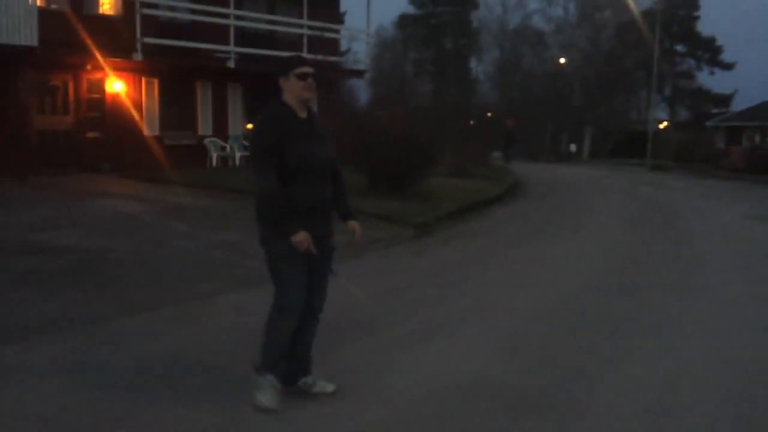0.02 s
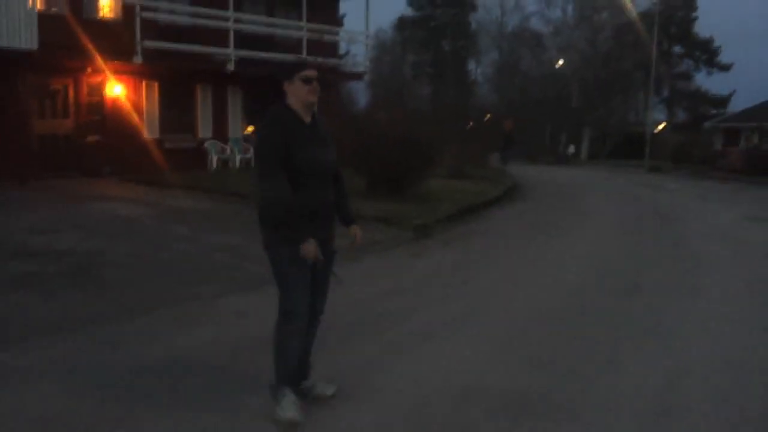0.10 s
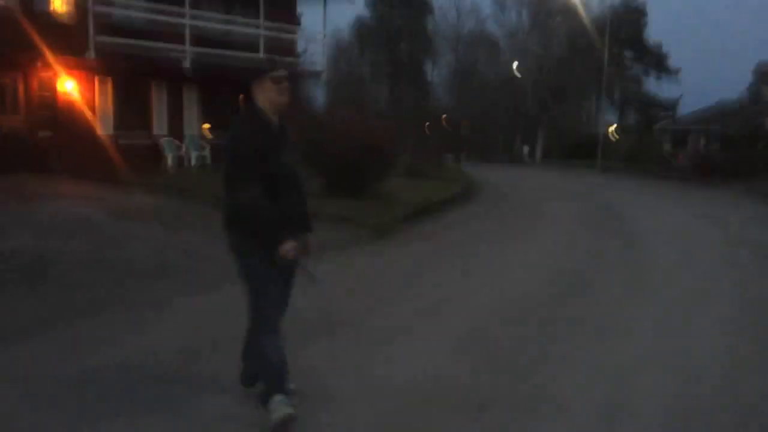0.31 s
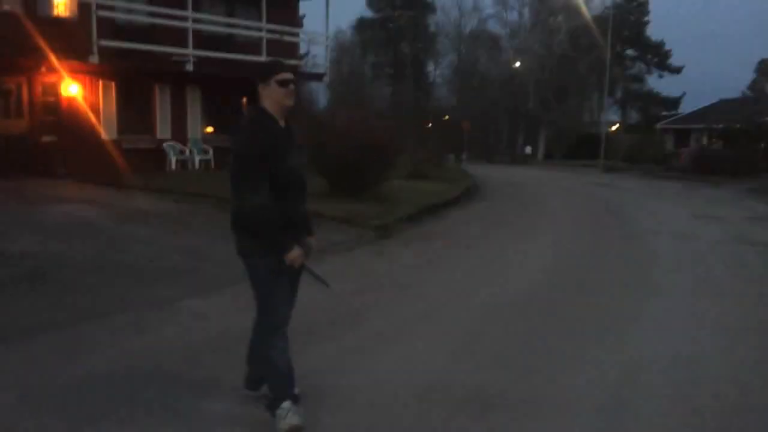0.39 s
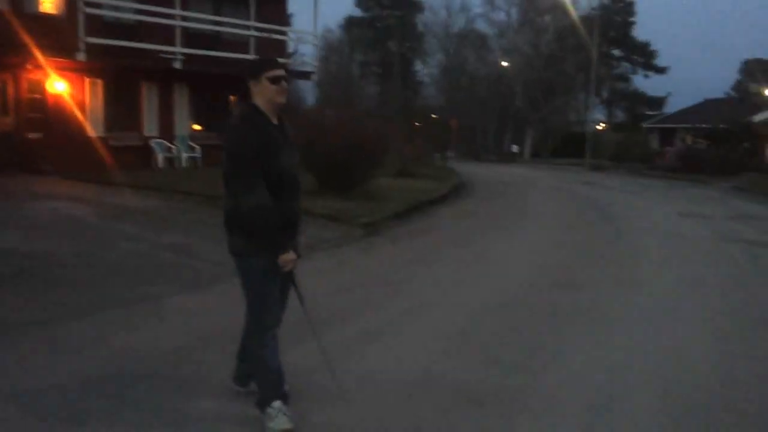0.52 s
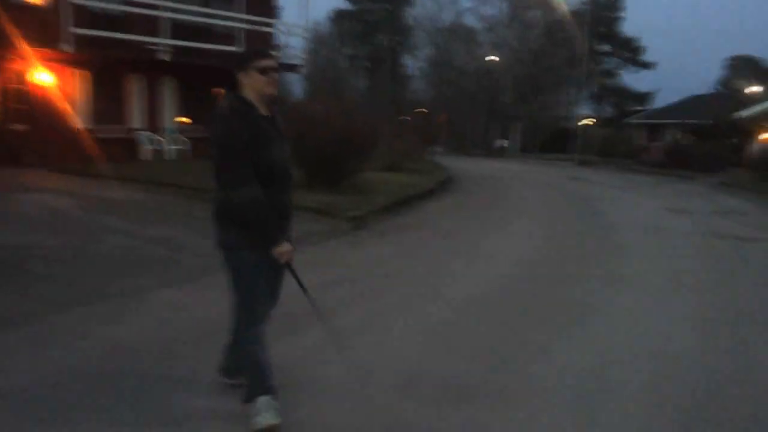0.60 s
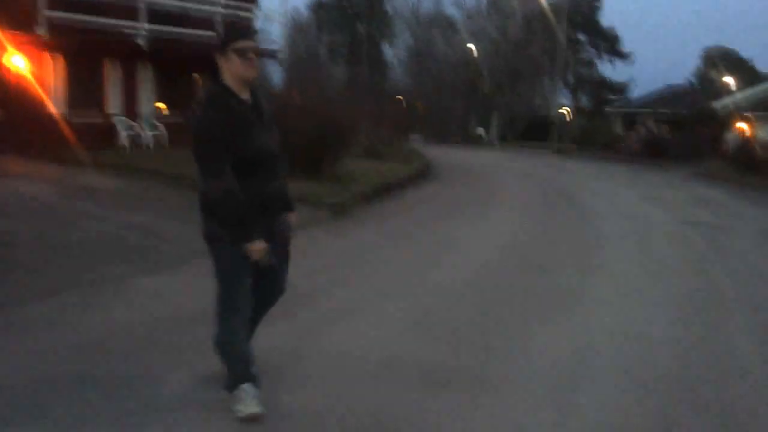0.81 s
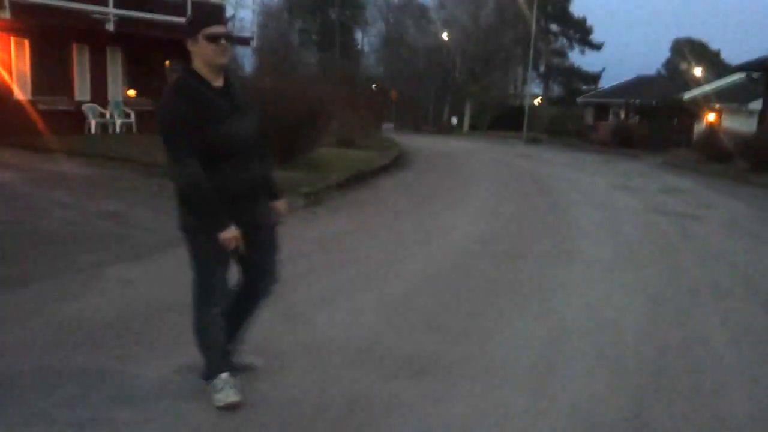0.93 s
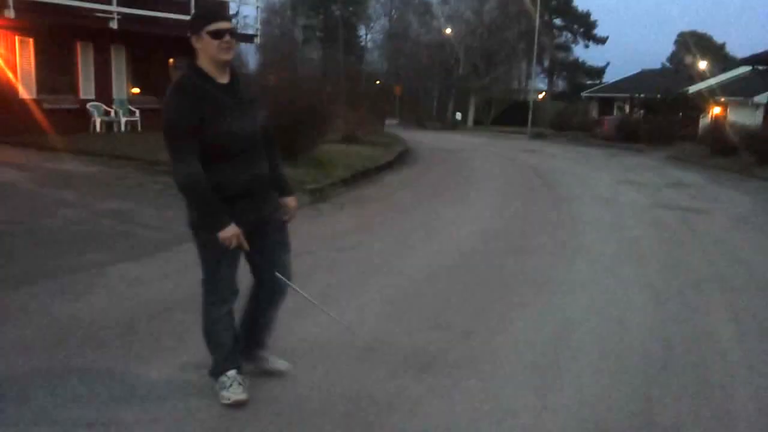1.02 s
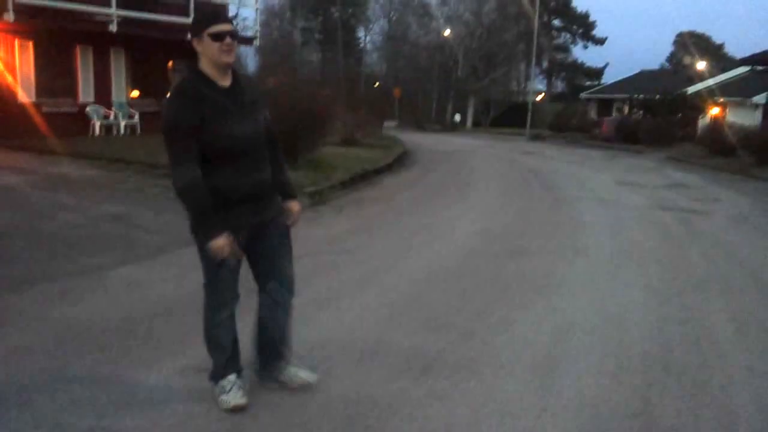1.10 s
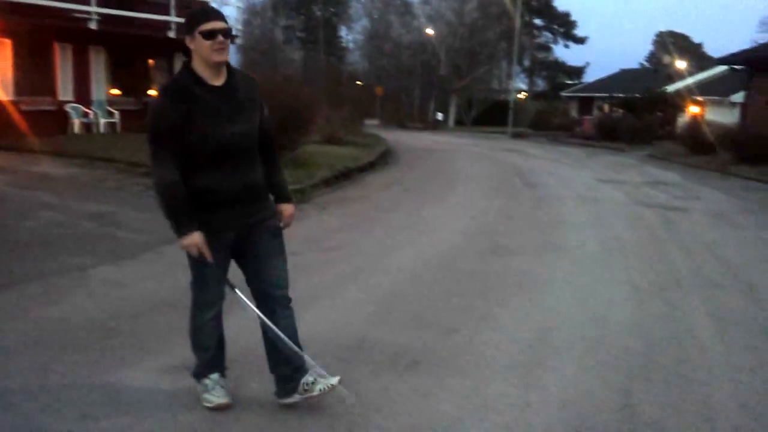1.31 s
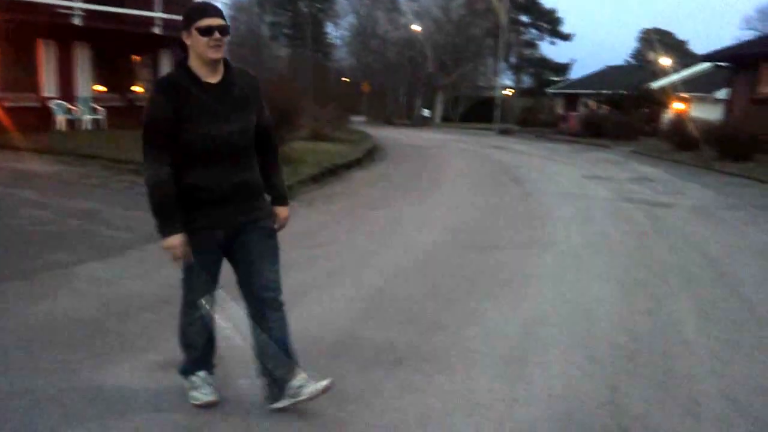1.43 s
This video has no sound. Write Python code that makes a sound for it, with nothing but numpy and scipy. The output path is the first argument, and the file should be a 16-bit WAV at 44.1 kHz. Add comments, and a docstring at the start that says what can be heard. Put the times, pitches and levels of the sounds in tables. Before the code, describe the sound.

A thin stick taps on asphalt four times at an even walking pace, at about 0.2, 0.6, 0.9 and 1.2 seconds. Each tap is a close, sharp, slightly crunchy click with a very short ring and a faint outdoor echo. Loose grit scuffs softly between them, with small stone ticks around the last two taps. A quiet, steady street hiss lies underneath throughout.

```python
"""A thin stick taps four times on asphalt, at walking pace, on a quiet street.
At each tap the tip chatters over the stones for a few milliseconds and excites the shaft's modes;
loose grit ticks and scuffs around the taps. Houses and trees reflect the sound faintly over a soft
outdoor hiss, and the loudest clicks overload the microphone."""
import sys
import numpy as np
from scipy import signal
from scipy.fft import rfft, irfft, next_fast_len
from scipy.io import wavfile
from scipy.ndimage import map_coordinates

SR = 44100
rng = np.random.default_rng(int(sys.argv[2]) if len(sys.argv) > 2 else 0)


def transcribe(signal):
    """Save signal, clipped to [-1, 1], as a 16-bit WAV file at the path in sys.argv[1]."""
    frames = np.atleast_2d(signal).T
    limited = np.clip(frames, -1, 1)
    pcm = np.round(limited * 32767).astype(np.int16)
    wavfile.write(sys.argv[1], SR, pcm)


N = 66150
T = np.arange(N) / SR
PAD = next_fast_len(N + 4096, real=True)
HZ = np.fft.rfftfreq(PAD, 1 / SR)
ATTACK_S, BASS_HZ, TREBLE_HZ = 0.00034, 1200, 7500

# Taps: t/s, gain/dB, resonance f/Hz, its lift/dB, its width/octaves, bass/dB, treble/dB,
# ring gain/dB, ring tilt/(dB per octave), echo gain/dB
TAPS = [(0.2346, -6.5, 4080, 10, 0.3, -1.5, -1, -1, 4, -25),
        (.5600, -5.5, 4310, 9.5, 0.27, -0.5, -7.5, -7, 0.5, -22),
        (0.8846, -11.5, 5550, 5, 0.256, 2.5, -1, -1.5, -0.5, -18),
        (1.209, -7.5, 2650, 4.5, 0.54, 2.5, 0, 5, -1.5, -17.5)]


def amp(db):
    """Amplitude ratio of a level in decibels."""
    return 10 ** (np.asarray(db) / 20)


def unit(x):
    """Normalisation to rms 1."""
    return x / np.sqrt(np.mean(x ** 2) + 1e-20)


def along(points, hz):
    """Interpolation of (f/Hz, value) points on a logarithmic frequency axis."""
    f, v = np.transpose(points)
    return np.interp(np.log(hz + 1), np.log(f + 1), v)


def filtered(x, response):
    """Linear filtering: the spectrum times a frequency response."""
    return irfft(rfft(x, PAD) * response, PAD)[:N]


def causal(gain):
    """Minimum-phase response with this gain: nothing sounds before its cause."""
    cepstrum = irfft(np.log(np.maximum(gain, 1e-6)), PAD)
    cepstrum[1:PAD // 2] *= 2
    cepstrum[PAD // 2 + 1:] = 0
    return np.exp(rfft(cepstrum))


def hump(hz, octaves):
    """Resonance curve with a peak of 1."""
    return 1 / (1 + (np.log2((HZ + 1) / hz) / octaves) ** 2)


def noise(gain):
    """Spectrally shaped Gaussian noise of rms 1."""
    return unit(filtered(rng.standard_normal(N), gain))


def burst(start, t60):
    """Impact envelope: a fast attack, then exponential decay by 60 dB in t60 seconds."""
    out = np.zeros(N)
    live = slice(round(start * SR), round((start + 2 * t60) * SR))
    age = np.maximum(T[live] - start, 0)
    out[live] = (1 - np.exp(-age / ATTACK_S)) * np.exp(-np.log(1000) * age / t60)
    return out


def air():
    """Ambient noise of the open street: broadband rumble and hiss, wavering slightly in level."""
    # Noise spectrum: f/Hz, relative density level/dB
    spectrum = [(25, -4), (50, 0), (100, -1), (170, -3.5), (280, -0.5), (420, -8), (520, -5), (700, -7.5),
                (1000, -11), (1600, -13), (3000, -13.5), (5500, -12.5), (7000, -13.5), (11500, -24.5),
                (15000, -39)]
    waver_db = 0.24 * map_coordinates(rng.standard_normal(32), [T * 10])
    return amp(-50.5 - waver_db) * noise(amp(along(spectrum, HZ)))


def grit():
    """Impact and friction noise: single stones tick, and fine grains scuff in swells."""
    # Stone impacts: t/s, level before filtering/dB, f/Hz, t60/s
    ticks = [(0.8522, -28, 6530, 0.0044), (0.8621, -30.5, 6000, 0.0091), (0.8713, -32, 6040, 0.0046),
             (.9190, -10.5, 6100, 0.0059), (0.9296, -15, 5900, 0.0061), (0.956, -28, 5500, .005),
             (1.2464, -14.5, 6000, 0.0085), (1.2822, -26.5, 5170, 0.0065), (1.2890, -21.5, 4560, .013)]
    # Scuffs: peak t/s, level before filtering/dB, rise/s, t60/s, f/Hz, width/octaves
    scuffs = [(0.053, -46, 0.079, 0.138, 4980, 0.49), (.13, -52, 0.0227, 0.157, 5450, 0.42),
              (.265, -34, 0.0122, 0.093, 7500, .5), (.308, -35.5, .025, 0.261, 7600, 0.87),
              (.403, -42.5, .012, 0.072, 5700, .6), (0.59, -36.5, .012, 0.24, 7000, 0.25),
              (.658, -47.5, 0.0062, 0.074, 2800, .11), (0.914, -31, 0.019, 0.087, 6060, 0.46),
              (.975, -40, 0.054, 0.67, 4590, 0.44), (1.253, -35.5, .02, .2, 5340, 0.3),
              (1.305, -40.5, 0.028, 0.25, 3900, 0.59), (1.38, -46.5, 0.021, .2, 4600, 0.36),
              (1.449, -44, .025, 0.136, 4545, 0.36)]
    grain_db, grains_per_s = 3.5, 550
    out = sum(amp(db) * burst(at, t60) * noise(hump(hz, octaves=0.35)) for at, db, hz, t60 in ticks)
    bass_cut = 1 / (1 + (BASS_HZ / (HZ + 1)) ** 2)
    for at, db, rise, t60, hz, octaves in scuffs:
        swell = np.exp(np.minimum((T - at) / rise, np.log(1000) * (at - T) / t60))
        roughness = map_coordinates(rng.standard_normal(N // 8), [T * grains_per_s], order=1)
        grains = unit(amp(grain_db * roughness))
        out += amp(db) * swell * grains * noise(hump(hz, octaves) * bass_cut)
    hollow_undertone = amp(7.5 * hump(hz=2800, octaves=0.16))
    treble_cut = 1 / np.hypot(1, (HZ / 10000) ** 2)
    return filtered(out, hollow_undertone * treble_cut)


def stick():
    """Impact excitation: a tap is a few quick contacts; the spot struck colours crunch and ring."""
    # Contacts of tip and stone: t/s, relative level/dB, crunch t60/s
    contacts = [(0.2341, -1.5, 0.014), (0.2356, 4, 0.0085), (0.2381, -2, 0.0152), (.2395, -5, 0.0069),
                (.2410, -6, 0.013), (0.2466, -1.5, 0.0092), (.5600, 5.5, 0.0062), (0.5619, -5, 0.019),
                (0.5655, -3, 0.013), (.8843, -1.5, 0.025), (0.8862, 4, 0.02), (0.8893, 1.5, 0.024),
                (0.892, -6, 0.025), (0.8966, 2, 0.01), (1.211, -1, 0.0082), (1.2123, 0, 0.0089),
                (1.213, -3.5, 0.01134)]
    # Contact noise: f/Hz, relative density level/dB
    crunch_spectrum = [(120, -38), (320, -9), (480, -20), (740, -6), (1080, -11), (1750, -6), (2800, -2.5),
                       (4500, 0), (7000, -1.5), (8500, -5.5), (10000, -7), (11500, -12.5), (15000, -13.5)]
    out = np.zeros(N)
    starts = np.array([row[0] for row in TAPS])
    bass_shelf = 1 / (1 + (HZ / BASS_HZ) ** 2)
    treble_shelf = (1 + np.tanh(2 * np.log2((HZ + 1) / TREBLE_HZ))) / 2
    for i, tap in enumerate(TAPS):
        _, db, hz, lift_db, octaves, bass_db, treble_db, ring_db, tilt_db, echo_db = tap
        touches = [row for row in contacts if np.argmin(abs(starts - row[0])) == i]
        force = np.sqrt(sum((amp(level) * burst(at, t60)) ** 2 for at, level, t60 in touches))
        ring = amp(ring_db - 15.5) * shaft(touches, tilt_db)
        crunch = force * noise(amp(along(crunch_spectrum, HZ)))
        echo = amp(echo_db) * street(crunch + amp(-8) * ring)  # more crunch than ring returns
        colour_db = lift_db * hump(hz, octaves) + bass_db * bass_shelf + treble_db * treble_shelf
        out += filtered(crunch + ring + echo, causal(amp(db + colour_db)))
    return out


def shaft(touches, tilt_db):
    """Damped modal vibration: every contact adds energy to all the modes of the shaft."""
    # Shaft modes: f/Hz, relative level/dB, t60/s
    modes = [(349, -25.5, 0.044), (923.8, -15, 0.0353), (1357, -8, 0.04), (2000, -2.5, 0.0265),
             (2265, -8, 0.0213), (2952, -6.5, 0.028), (3169, -3, 0.02), (3533, -1, 0.019),
             (3714, -2.5, 0.0167), (4078, -5, 0.016), (4540, 3, 0.022), (5016, -2, 0.014),
             (5705, -5.5, 0.03), (6724, 1.5, 0.015)]
    pivot_hz, scatter_db = 3700, 2.76
    hz, db, t60 = np.transpose(modes)[:, :, None]
    start = min(row[0] for row in touches)
    t, out = T[:SR // 10], np.zeros(N + SR)
    energy = 0
    for at, level, _ in touches:
        age = np.maximum(t + start - at, 0)
        envelope = (1 - np.exp(-age / ATTACK_S)) * np.exp(-np.log(1000) * age / t60)
        energy += (amp(level) * envelope) ** 2
    strength = amp(db + tilt_db * np.log2(hz / pivot_hz) + scatter_db * rng.standard_normal(hz.shape))
    tones = np.sin(2 * np.pi * (hz * t + rng.random(hz.shape)))
    out[round(start * SR):][:len(t)] = (strength * np.sqrt(energy) * tones).sum(0)
    return out[:N]


def street(x):
    """Reverberation: diffuse scattering by trees and gardens, smeared reflections from house fronts."""
    # Reverberation time: f/Hz, t60/s
    decay_times = [(300, 0.01), (2000, .6), (5000, 0.47), (11000, .45)]
    # House fronts: delay t/s, level re the diffuse tail/dB, smear t60/s
    walls = [(0.01, -2.5, .03), (.066, -13.5, 0.14), (.165, -16, .05)]
    # Colour of the reflected sound: f/Hz, gain/dB
    colour = [(200, 7), (800, 8), (1400, -3.5), (2100, -2.5), (2850, 4), (3700, -8.5), (5700, 2.5),
              (7200, 3.5), (11000, -5.5)]
    hz, t, spectra = signal.stft(rng.standard_normal(N), SR, nperseg=256)
    decay = np.exp(-np.log(1000) * t / along(decay_times, hz)[:, None])
    tail = unit(signal.istft(spectra * decay, SR, nperseg=256)[1][:N])
    for delay, db, smear in walls:
        tail += amp(db) * unit(rng.standard_normal(N) * burst(delay, smear))
    reflected = signal.fftconvolve(x, tail)[:N] / np.sqrt(N)
    return filtered(reflected, amp(along(colour, HZ)))


def thump():
    """Low thump: a short, dull swell of low level follows each tap, too low to ring."""
    rise_s, fall_s, hold_s, low_cut_hz = 0.00187, 0.057, 0.0483, 2.4
    swell = np.zeros(N)
    for at, *_ in TAPS:
        age = np.maximum(T - at, 0)
        release = (1 - np.tanh((T - at - hold_s) / rise_s / 2)) / 2
        swell += (1 - np.exp(-age / rise_s)) * np.exp(-age / fall_s) * release
    return amp(-32.5) * filtered(swell, 1j * HZ / (low_cut_hz + 1j * HZ))


def scene():
    """Superposition of stick, low thumps, grit and ambient noise, in mono."""
    return (stick() + thump() + grit() + air())[None]


def record(dry):
    """Band limiting and saturation: the microphone loses the top treble and rounds off the peaks."""
    shelf_hz, shelf_db, ceiling, top_hz = 11900, -15, 0.96, 16000
    dulled = filtered(dry[0], amp(shelf_db * np.clip((HZ - shelf_hz) / 200 + .5, 0, 1)))
    clipped = dulled / (1 + (dulled / ceiling) ** 6) ** (1 / 6)
    return filtered(clipped, np.clip((top_hz - HZ) / 400 + .5, 0, 1))[None]


dry = scene()
out = record(dry)
transcribe(out)
```